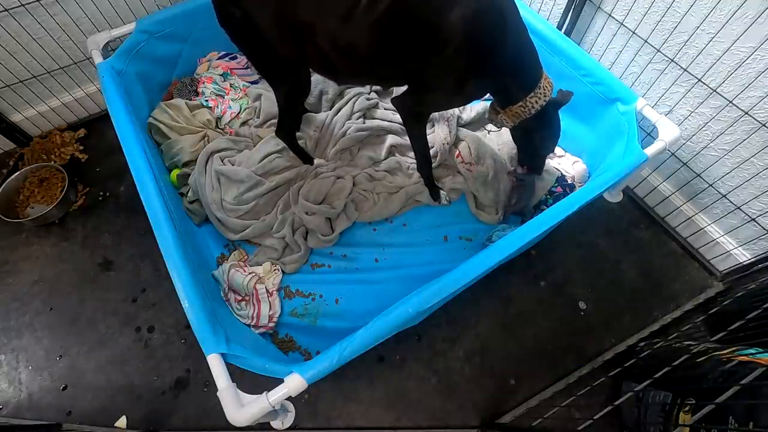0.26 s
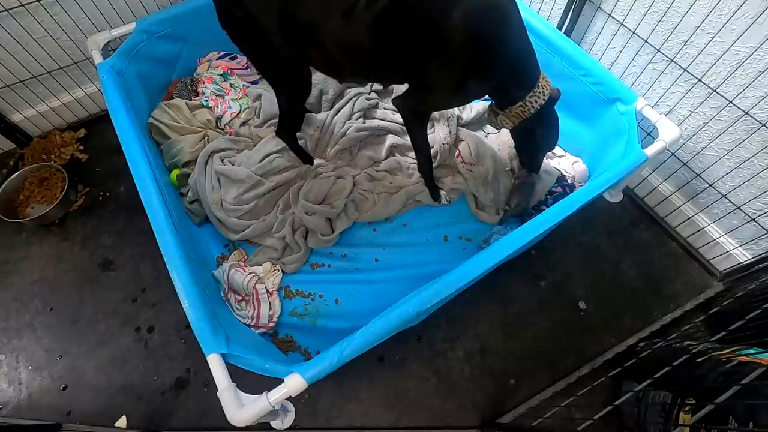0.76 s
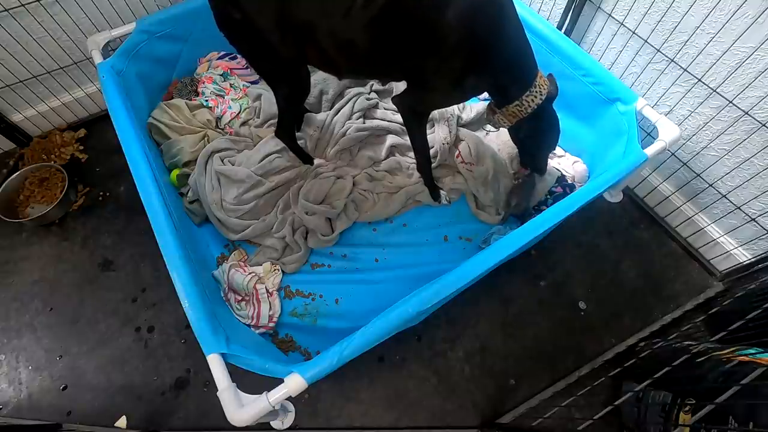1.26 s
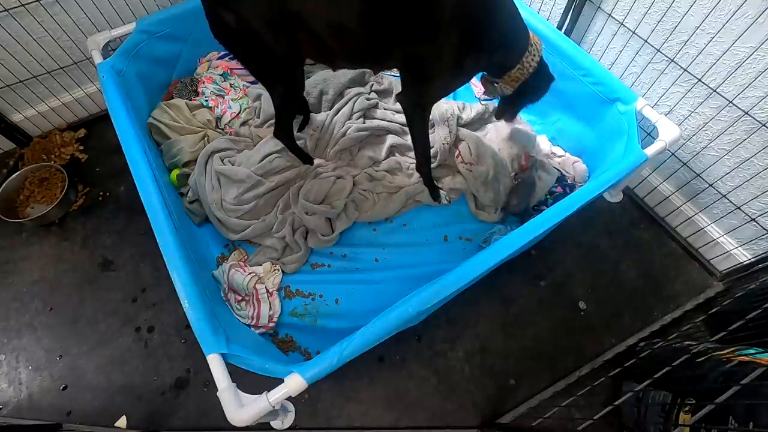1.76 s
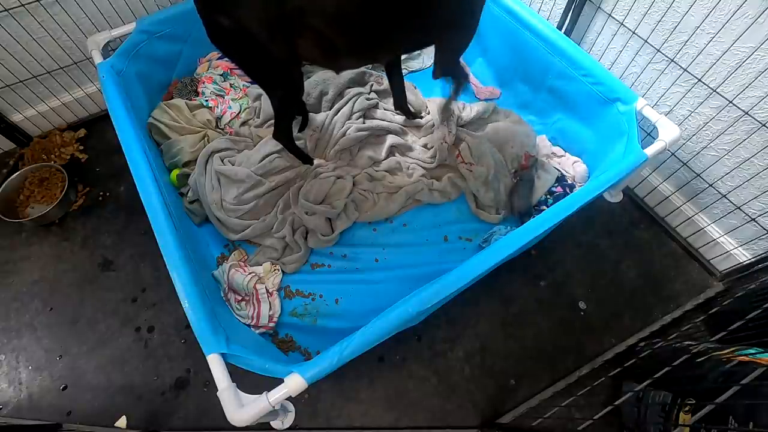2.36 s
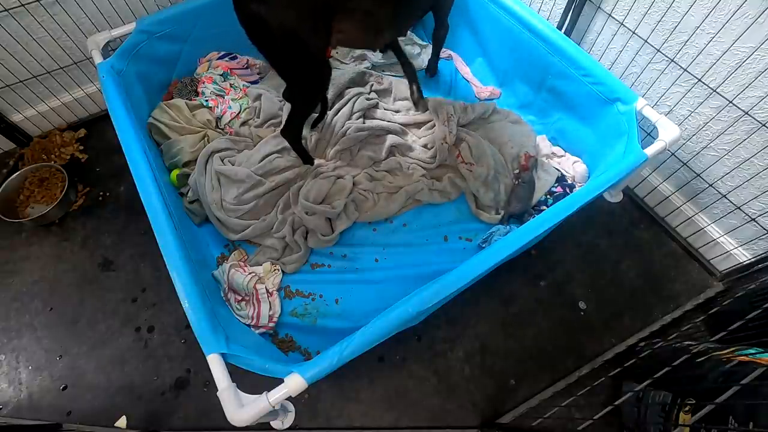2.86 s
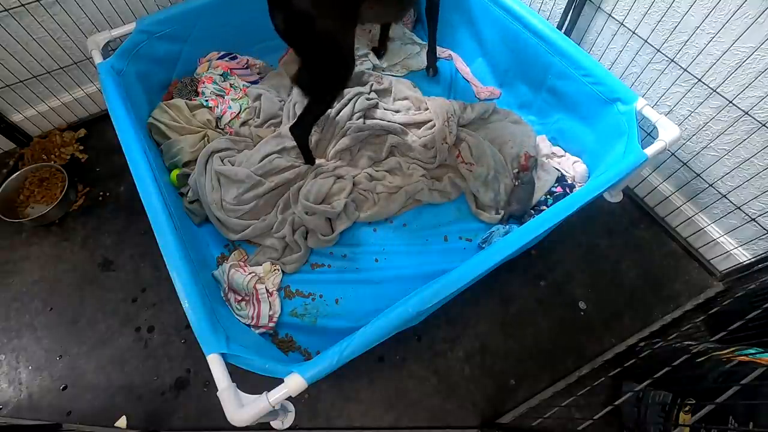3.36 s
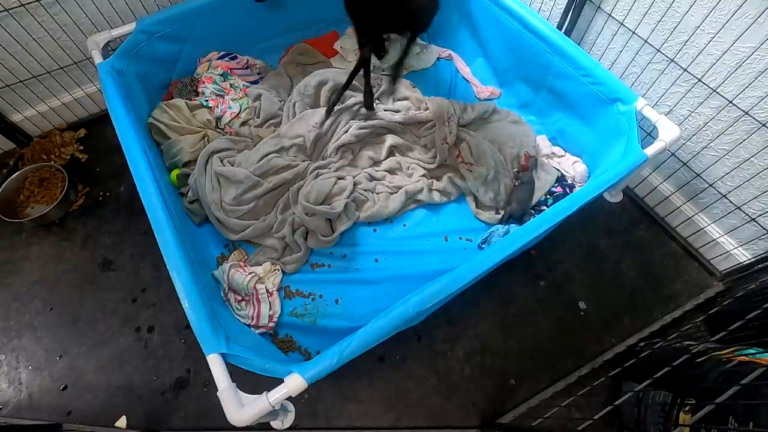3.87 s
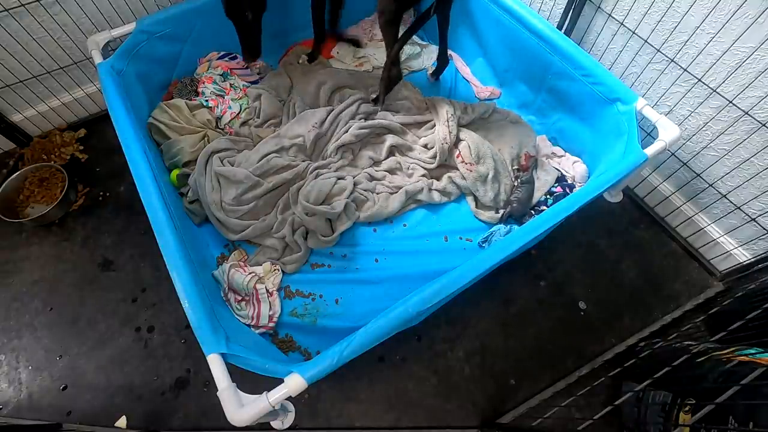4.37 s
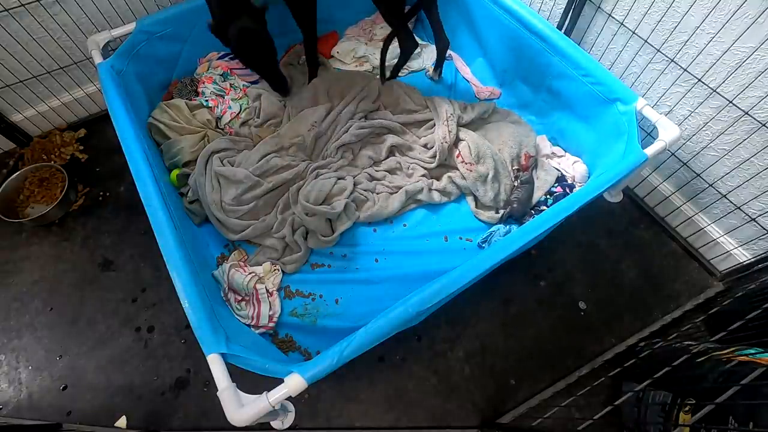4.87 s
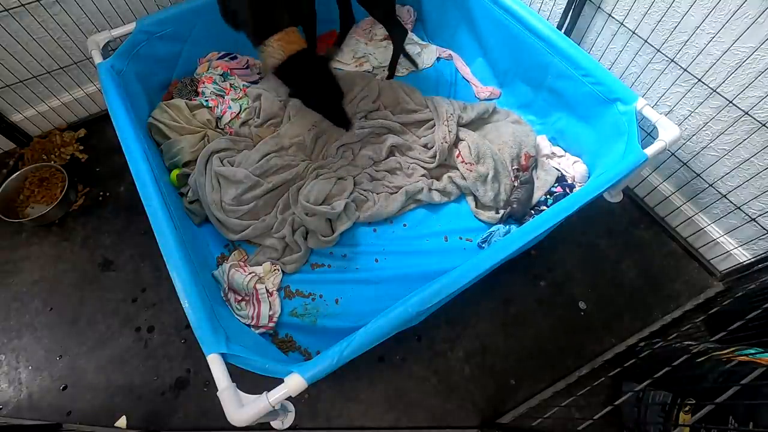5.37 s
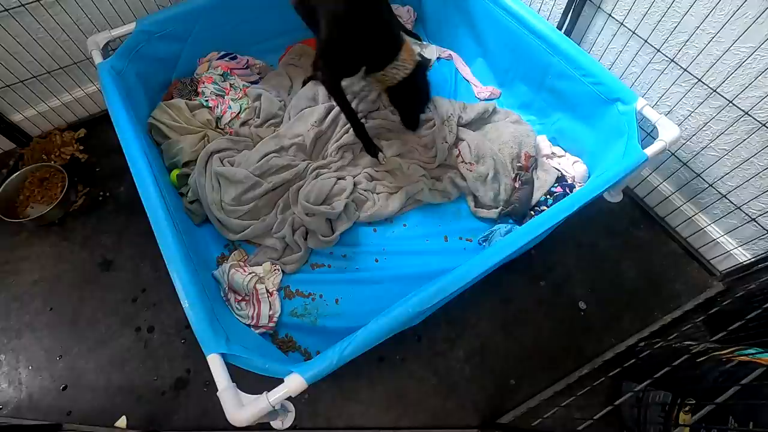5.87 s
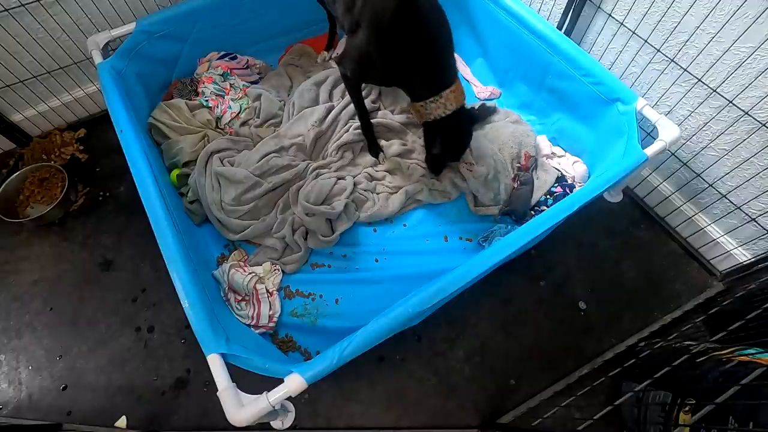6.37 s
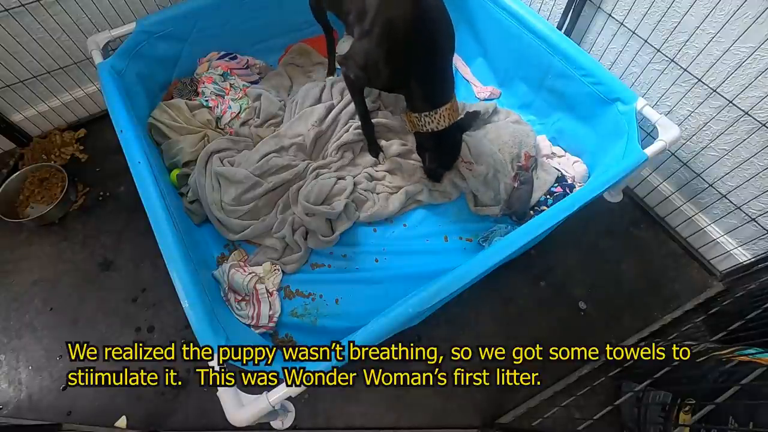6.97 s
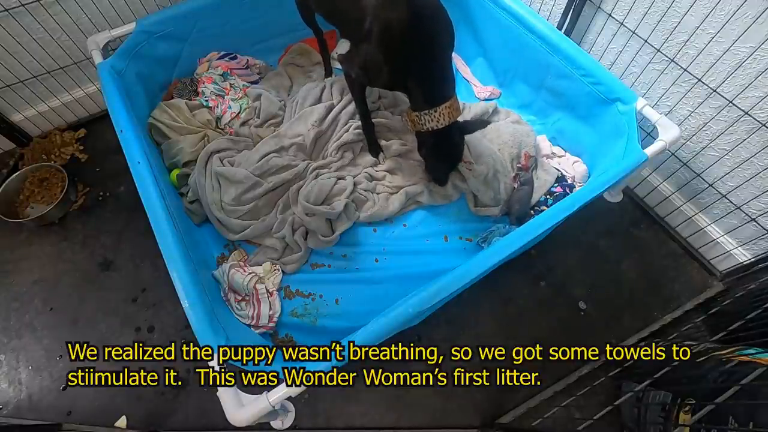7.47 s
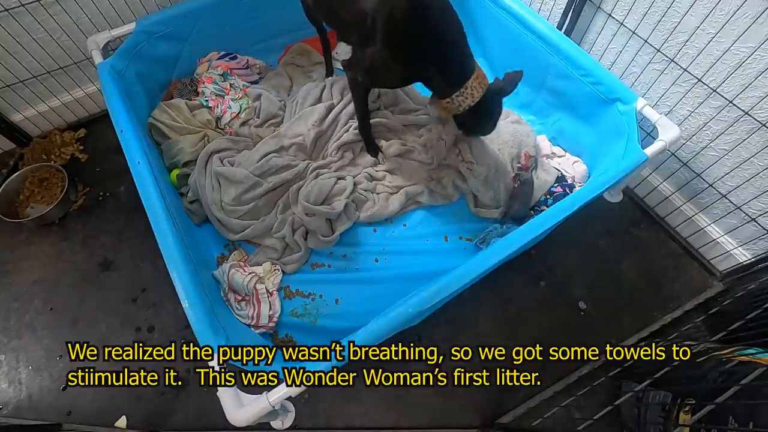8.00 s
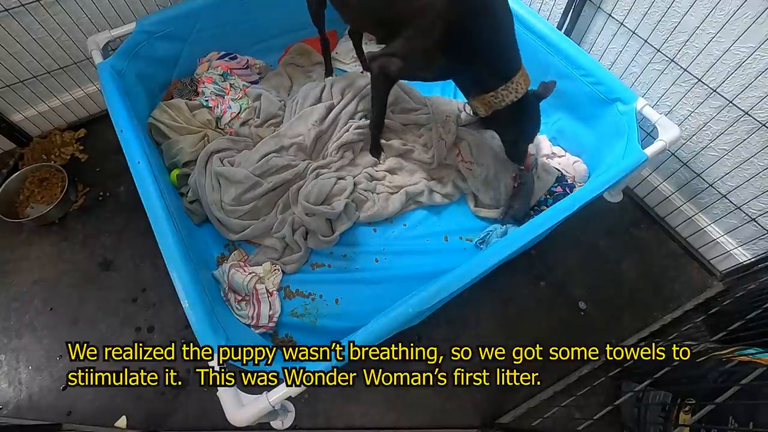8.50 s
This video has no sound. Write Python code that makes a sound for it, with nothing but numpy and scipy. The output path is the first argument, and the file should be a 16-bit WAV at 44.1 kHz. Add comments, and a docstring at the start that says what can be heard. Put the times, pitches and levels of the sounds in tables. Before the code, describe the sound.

In a quiet kennel room with soft hum and low air rumble, a dog moves about on blankets in a plastic-sheet pen. Dull thuds and drummy rustles come first, then paw scuffs and claw ticks, a small collar tag clinking near three seconds, and sharper scratches. Later the nose snuffles while cloth rubbing grows loudest, close to a stereo microphone.

```python
"""A dog moves on blankets in a taut plastic-sheet pen in a quiet kennel room, before a two-port microphone.
From the start, over soft hum noise and low air rumble, trains of tiny slips rub cloth and drum the sheet; filtered
noise lands as dull thuds. From 1 s paws scuff in dying noise bursts with claw ticks. A tag clinks from 2.9 s, mostly
before 3.4 s, as fading sine modes. Air gusts are strongest near 5.2 s. From 6.6 s the nose snuffles, noise in a falling
resonance; the cloth is loudest near 7.8 s, and snuffles return at 8.4 s."""
import sys
import numpy as np
from scipy import signal
from scipy.fft import rfft, irfft
from scipy.io import wavfile
from scipy.ndimage import uniform_filter1d

SR = 44100
rng = np.random.default_rng(int(sys.argv[2]) if len(sys.argv) > 2 else 0)


def store_pcm(level_fs):
    """Save levels as 16-bit WAV."""
    pcm = np.round(np.clip(level_fs, -1, 1) * 32767).astype(np.int16)
    wavfile.write(sys.argv[1], SR, np.atleast_2d(pcm).T)


N = 385434

# Spectrum of fibres and fur: hz, relative_density_db (dB per Hz)
FIZZ = [(1470, -52), (2500, -2), (3690, -1), (5710, -4), (8700, -12), (12100, -23.5), (14400, -35),
        (15600, -46)]
# Where the dog is: time_s, left_minus_right_db
PLACE = [(0.0, 3), (0.85, 5), (1.27, -0.5), (2.02, 3.5), (2.38, 0), (4.65, 3.5), (5.23, -2.5), (5.84, 3),
         (8.01, 5), (8.74, 2)]
# Strokes of dragging cloth: start_s, rise_s, hold_s, rub_level_db, fade_db_per_s,
# sheet_weight_db (re rub), fibre_fizz_db (re rub), drum_note_hz
STROKES = [(0.0, 0.003, 0.28, -71, 37, 5, -1, 330), (0.328, 0.0072, 0.085, -51, 111, 8.5, -8, 513),
           (0.575, 0.0097, 0.032, -45, 106, 9.5, -10, 476), (0.702, 0.055, 0.03, -43, 54, 1, -9.5, 447),
           (0.803, 0.012, 0.048, -44.5, 110, 6.5, -5, 475), (1.09, 0.023, 0.18, -76.5, 56, -5, 8.5, 320),
           (1.508, 0.0064, 0.031, -72.5, 80, 12, -2, 494), (1.646, 0.003, 0.089, -59, 220, -0.5, 1.5, 543),
           (1.803, .01, 0.018, -59, 120, 1, -5, 500), (1.852, 0.044, 0.022, -46.5, 139, 5, -3.5, 580),
           (2.43, 0.009, .03, -69.5, 16, 2, 0, 267), (2.625, 0.0045, 0.031, -59, 79, -5.5, -14, 267),
           (2.733, 0.016, 0.088, -65.5, 55, 2.5, -6.5, 297), (2.89, 0.021, 0.022, -64, 60, -15, 3.5, 290),
           (3.004, 0.061, 0.16, -61, 76, -0.5, -1, 250), (3.402, 0.005, 0.028, -59.5, 150, -3.5, -13, 266),
           (3.553, 0.013, 0.012, -72.5, 71, -4, 9, 275), (3.712, 0.011, 0.037, -62, 130, -13, -2, 275),
           (3.809, 0.0025, 0.0059, -43.5, 99, -10.5, -6, 259),
           (4.035, 0.0022, 0.0061, -52.5, 204, -7, 0, 420), (4.073, 0.016, 0.01, -51.5, 65, -8, -5.5, 417),
           (4.248, 0.0032, 0.028, -56, 63, -4.5, 4, 476), (4.34, 0.029, 0.028, -55.5, 106, -0.5, -5, 482),
           (4.575, 0.02, 0.056, -53.5, 123, -18, -4.5, 640), (4.91, 0.0098, 0.014, -65, 87, -25, -14, 250),
           (5.228, 0.023, 0.24, -59.5, 44, -7, 3, 292), (5.565, 0.16, 0.016, -51, 84, -16, 1.5, 300),
           (5.677, 0.029, 0.14, -46.5, 118, -1.5, -19, 358),
           (6.015, 0.0064, 0.0044, -44, 121, -5.5, 2, 374), (6.24, 0.028, 0.16, -65.5, 58, -6, -5, 310),
           (6.371, 0.057, 0.011, -41.5, 142, -8.5, -13.5, 570),
           (6.502, 0.0058, 0.011, -36, 86, -17, -14, 280), (6.518, 0.0071, 0.0062, -38, 112, 3, -7, 294),
           (6.634, 0.039, 0.034, -46, 85, -9.5, -16, 408),
           (6.756, 0.016, 0.028, -53.5, 89, -2.5, -24.5, 517),
           (6.887, 0.0075, 0.031, -46.5, 82, -9.5, -20.5, 613),
           (7.023, 0.019, 0.086, -43, 98, -8.5, -16, 442), (7.215, 0.026, 0.068, -52, 26, -0.5, -10.5, 533),
           (7.369, 0.082, 0.013, -41.5, 74, -5, -13, 500), (7.581, 0.013, 0.017, -47, 90, -8.5, -11.5, 506),
           (7.626, 0.12, 0.057, -35.5, 88, -7.5, -20, 460), (7.824, 0.0079, 0.02, -32, 90, -6, -34, 454),
           (7.883, 0.022, 0.032, -34.5, 90, -16, -19.5, 354),
           (7.99, 0.012, 0.031, -33.5, 79, -9, -17.5, 460),
           (8.197, 0.068, 0.039, -45.5, 102, -35, -6.5, 585),
           (8.355, 0.048, 0.014, -37.5, 69.5, -26, -12, 580), (8.435, 0.029, 0.2, -63.5, 55, 5, 0.5, 600)]


def gain_of(db):
    """Decibels to amplitude."""
    return 10 ** (np.asarray(db) / 20)


def evened(x):
    """Scales to rms 1."""
    return x / np.sqrt(np.mean(x ** 2) + 1e-20)


def read(points, hz, axis=1):
    """A spectrum column on a log-frequency axis."""
    table = np.transpose(points)
    return np.interp(np.log(hz + 1), np.log(table[0] + 1), table[axis])


def follow(rows, axis):
    """A curve column at every sample."""
    table = np.vstack(rows).T
    return np.interp(np.arange(N) / SR, table[0], table[axis])


def spread(per_ms):
    """From ms steps to samples."""
    return np.interp(np.arange(N) / SR * 1000, np.arange(len(per_ms)), per_ms)


def panned(x, db):
    """Two channels, the left louder than the right by db."""
    return x * gain_of(np.array([db / 2 * np.ones(N), -db / 2 * np.ones(N)]))


def shaped(x, spectrum, patchy_db, size, peak_hz=None, peak_db=0., octaves=1.):
    """Colours x, lifts a moving resonance and lets random patches of time and frequency stand out."""
    overlap = size * 3 // 4
    hz, t, z = signal.stft(x, SR, nperseg=size, noverlap=overlap)
    patches = rng.standard_normal(z.shape[::-1]).T
    patches = uniform_filter1d(patches, size=4, axis=0)
    patches = evened(uniform_filter1d(patches, size=12, axis=1))
    colour = gain_of(read(spectrum, hz))[:, None] * np.ones(t.size)
    if peak_hz is not None:
        centre = np.interp(t, np.arange(N) / SR, peak_hz)
        distance = np.log2((hz[:, None] + 1) / centre) / octaves
        colour = colour * gain_of(peak_db * np.exp(-distance ** 2))
    colour = colour / np.linalg.norm(colour, axis=0)  # the resonance moves the colour, not the loudness
    z = z * colour * gain_of(patchy_db * patches)
    return evened(signal.istft(z, SR, nperseg=size, noverlap=overlap)[1][:N])


def hum():
    """Soft steady room noise, most alike in the two ports around 300 Hz."""
    # The quiet room's spectrum: hz, relative_density_db (dB per Hz)
    hum_colour = [(35, -42), (60, -0.5), (91, 3.5), (132, -0.5), (278, 7.5), (443, -6), (775, -13),
                  (1000, -14), (1520, -6), (3510, -30), (5100, -12.5), (8500, -20.5), (11500, -38),
                  (15600, -59)]
    # Left-right likeness: hz, correlation (0 to 1)
    likeness = [(60, 0.28), (125, 0.39), (300, 0.83), (900, 0.12), (3800, 0.078)]
    a, b = (shaped(rng.standard_normal(N), hum_colour, patchy_db=2.0, size=2048) for _ in "LR")
    same = np.clip(read(likeness, np.fft.rfftfreq(N, 1 / SR)), -1, 1)
    right = irfft(same * rfft(a) + np.sqrt(1 - same ** 2) * rfft(b), N)
    return gain_of(-65) * np.array([a, right])


def air():
    """Moving air at the microphone: lumpy low rumble, mostly shared by the ports, swelling in gusts."""
    # Gusts: centre_s, level_db, half_width_s (to 1/e of the amplitude)
    gusts = [(0.75, -66, 0.22), (1.9, -74, 0.17), (4.0, -81, 0.25), (4.93, -64.5, 0.17),
             (5.2, -53.5, 0.098), (5.75, -65, 0.093), (6.35, -59, 0.19), (6.9, -58, 0.077),
             (8.7, -64, 0.16)]
    calm_db = -73
    band = signal.butter(2, [20., 48.], "band", fs=SR, output="sos")
    shared, left, right = signal.sosfilt(band, rng.standard_normal((3, N)))
    t = np.arange(N) / SR
    swells = sum(gain_of(db) * np.exp(-((t - s) / width) ** 2) for s, db, width in gusts)
    return (gain_of(calm_db) + swells) * evened(shared + 0.56 * np.array([left, right]))


def thuds():
    """The dog's weight lands dully: low resonant noise of the pen swells and dies under each heavy step."""
    # Heavy steps: start_s, level_db (before rise and fade)
    steps = [(.345, -42), (.595, -42.5), (.82, -44), (1.9, -44.5)]
    centre_hz, rise_s, t60_s = 194, 0.047, 0.53
    resonance = signal.iirpeak(centre_hz, 1.6, SR)
    low = signal.lfilter(*resonance, rng.standard_normal(N))
    low = evened(signal.lfilter(*resonance, low))
    start, db = np.transpose(steps)[:, :, None]
    after = np.maximum(np.arange(N) / SR - start, 0)
    level = np.minimum(after / rise_s, 1) * gain_of(db - 60 * after / t60_s)
    return low * level.sum(0)


def tag():
    """The metal tag rings its modes, each blow exciting them a little differently; light touches die sooner."""
    # Collar tag clinks: start_s, level_db, low_modes_db (relative)
    clinks = [(2.881, -64, -13), (3.047, -46.5, -10), (3.072, -78, 1), (3.126, -69, 10),
              (3.147, -65.5, 6.5), (3.183, -75, -3), (3.215, -64, -2), (3.254, -57.5, -4), (3.312, -74, -9),
              (4.916, -72, 7), (5.685, -71, 16), (6.245, -67, -1), (6.374, -70, -9), (6.493, -69, -8),
              (6.649, -67, -6), (6.738, -66, 7)]
    # Tag modes: hz, relative_level_db, t60_s (longest, for firm touches)
    tag_modes = [(3120, 4, 0.14), (7090, 3, 0.1), (7140, -7, 0.3), (8452, 3, 0.18), (8823, -12, 0.13),
                 (14400, -24, 0.3), (14780, -24, .3)]
    split_hz = 8000  # modes under this count as low
    out, t = np.zeros(N + 8192), np.arange(8192) / SR
    chance_db = rng.standard_normal((len(clinks), len(tag_modes)))
    for (s, db, low_db), blow_db in zip(clinks, chance_db):
        lasts = np.clip(gain_of(.25 * (db + 58)), .5, 1)
        rings = np.zeros(8192)
        for (hz, mode_db, t60), extra_db in zip(tag_modes, blow_db):
            level_db = mode_db + low_db * (hz < split_hz) + extra_db
            rings += gain_of(level_db - 60 * t / (t60 * lasts)) * np.sin(2 * np.pi * hz * t)
        out[round(s * SR):][:8192] += gain_of(db) * np.minimum(t / 0.0011, 1) * rings
    return panned(out[:N], 0)


def snuffles():
    """Turbulent air through the nose: noise in one falling resonance, passed twice so it sounds hollow."""
    # Snuffles into the blankets: start_s, length_s, level_db, change_by_end_db,
    # resonance_from_hz, resonance_to_hz, width_hz (of each pass)
    sniffs = [(6.64, 0.13, -42.5, 0.5, 1550, 1450, 450), (6.769, 0.16, -37.5, -20, 1750, 1540, 870),
              (6.928, 0.12, -38, -11, 1900, 1630, 220), (6.927, 0.13, -35, -11, 1460, 970, 262),
              (7.036, 0.087, -42, 2.5, 1670, 1610, 600), (8.38, 0.074, -38.5, -5, 1680, 1670, 110),
              (8.464, 0.19, -42, -8, 925, 646, 470)]
    rise, settle = 0.093, 0.13  # shares of the length: level rise, time constant of the pitch fall
    out = np.zeros(N)
    for s, length, db, change_db, from_hz, to_hz, width_hz in sniffs:
        u = np.arange(0, length, 1 / SR) / length
        hz = to_hz + (from_hz - to_hz) * np.exp(-u / settle)
        turn = np.exp(2j * np.pi * np.cumsum(hz) / SR)
        r = np.exp(-np.pi * width_hz / SR)
        # filter around zero frequency, then turn back up to the moving pitch
        noise = rng.standard_normal(SR // 4)[:u.size]
        slow = signal.lfilter([1], [1, -2 * r, r * r], noise / turn)
        shape = np.minimum(u / rise, 1) * gain_of(change_db * u) * np.sqrt(1 - u)
        out[round(s * SR):][:u.size] += gain_of(db) * shape * evened((slow * turn).real)
    return panned(out, follow(PLACE, axis=1))


def paws():
    """Each scuff is a dying burst of uneven noise: a broad ring and a bright edge, with a short claw tick."""
    # Paw scuffs and claw ticks: contact_s, level_db, centre_hz, treble_db (re ring), t60_s
    scuffs = [(1.07, -38, 900, -19, 0.13), (1.197, -37.5, 1510, -15, 0.05), (1.513, -39, 750, -18, 0.086),
              (1.81, -46.5, 1490, -14, 0.095), (2.63, -35, 2160, -19, 0.044),
              (2.643, -32.5, 1550, -32, 0.025), (2.66, -37.5, 2300, -13, 0.091),
              (2.67, -34.5, 1440, -10.5, 0.1), (3.411, -51, 1200, -2, 0.095), (3.477, -41, 940, -26, 0.03),
              (3.598, -45, 1510, -25, 0.026), (3.696, -44, 1620, 1, 0.024), (3.713, -37, 1620, -6, 0.053),
              (3.814, -31, 1720, -1.5, 0.054), (3.898, -27.5, 2230, -34, 0.073),
              (4.039, -33, 1850, -1, 0.044), (4.088, -37, 1730, -8, 0.1), (4.111, -37.5, 4000, 14, 0.011),
              (4.119, -21, 1730, -1, 0.0086), (4.256, -34, 2270, -6, 0.061),
              (4.298, -47, 2620, 19.5, 0.058), (4.62, -37, 1250, -25, 0.14),
              (4.659, -62.5, 2980, 26, 0.045), (4.949, -46, 2600, -14, 0.056),
              (4.964, -45.5, 2900, -16, 0.04), (5.047, -50, 1960, -14, 0.072),
              (5.058, -47, 2050, -12, 0.048), (5.452, -41, 584, -30, 0.029), (6.02, -35, 3000, 15.5, 0.043),
              (6.53, -18.5, 3250, -23, 0.11), (6.803, -48, 5000, -3, 0.03), (7.455, -26, 1300, -24, 0.056),
              (7.688, -30.5, 3070, -8, 0.11), (7.721, -28, 3300, -18, 0.096), (7.76, -21, 2070, -25, 0.14),
              (7.772, -18.5, 1510, -32, 0.046), (7.837, -18.5, 1790, -47, 0.08),
              (7.914, -25, 1480, -38, 0.12), (8.015, -34, 1740, -32, 0.035), (8.035, -24, 1230, -24, 0.19)]
    rings, edges, t = np.zeros(N + 8192), np.zeros(N + 8192), np.arange(8192) / SR
    hz = np.fft.rfftfreq(8192, 1 / SR)
    for s, db, centre_hz, treble_db, t60 in scuffs:
        grains = gain_of(2.6 * np.minimum(rng.exponential(1, 8192), 4.))
        burst = rfft(rng.standard_normal(8192) * grains)
        detune = (hz / centre_hz - centre_hz / (hz + 1)) / 0.37
        ring = irfft(burst / (1 + detune ** 2))
        edge = irfft(burst * gain_of(read(FIZZ, hz)))
        shape = (1 - np.exp(-t / 0.0014)) * gain_of(-60 * t / max(t60, .01))
        size = gain_of(db - 9.5) * np.sqrt(np.mean(shape ** 2))  # longer shapes carry more energy
        tick = gain_of(db - 5 - 60 * t / min(t60, 0.022)) * np.sin(2 * np.pi * centre_hz * t)
        start = round((s - .0006) * SR)  # the sound begins just before the listed time
        rings[start:][:8192] += size * evened(shape * ring)
        rings[start:][:8192] += tick
        edges[start:][:8192] += size * gain_of(treble_db) * evened(shape * edge)
    return panned(rings[:N], follow(PLACE, axis=1)) + edges[:N]


def slips(per_s, spread_db, clump_db):
    """Tiny stick-slip clicks of random sign and size, their strength varying in clumps of about 11 ms."""
    size = gain_of(spread_db * np.minimum(rng.exponential(1, N), 3.5))
    clumps = evened(uniform_filter1d(rng.standard_normal(N), size=500))
    return size * gain_of(clump_db * clumps) * rng.standard_normal(N) * (rng.random(N) < per_s / SR)


def stroke_powers(lag_s, damping):
    """Power of every stroke at each ms: a softly starting rise, a hold, then a steady dB fade."""
    start, rise, hold, db, fade = np.transpose(STROKES)[:5, :, None]
    t = np.arange(0, N / SR + .01, .001) - lag_s - start
    rise = np.maximum(rise, .001)
    swell = np.clip(t / rise, 0, 1) ** 1.25  # an exponent over 1 starts the rise softly
    fading_s = np.maximum(t - rise - np.maximum(hold, 0), 0)
    return (swell * gain_of(db - damping * fade * fading_s)) ** 2


def cloth():
    """One train of slips drums the sheet and rubs the blankets; the fizz comes from all over the cloth."""
    # Drumming plastic sheet: hz, relative_density_db (dB per Hz)
    sheet_colour = [(47, -48), (120, -7), (221, -0.5), (491, -5), (760, -4), (1160, -17), (1500, -23),
                    (1950, -82)]
    # Resonances added to the sheet: hz, width_hz, added_level_db
    sheet_modes = [(216, 230, 1), (387, 19, -2), (551, 78, -3.5), (780, 34, -3), (922, 67, 9.5)]
    # Cloth on cloth: hz, relative_density_db (dB per Hz)
    rub_colour = [(290, -69), (520, -10.5), (824, -7.5), (1080, 2.5), (1950, 1), (2720, -4), (3450, -5.5),
                  (4050, -11.5), (6000, -26.5), (7800, -52), (13200, -120)]
    stir_db, stir_sheet_db, stir_fizz_db, rest_note_hz = -78.5, -86, -79, 250  # never quite still
    frame_hz, frame_width_hz, frame_db = 2230, 140, -15  # the pen's frame rings faintly

    weight_db, fizz_db, note_hz = np.transpose(STROKES)[5:, :, None]
    slide = stroke_powers(lag_s=0, damping=1)
    # weight sinks into the sheet after the cloth starts to slide, and fades faster
    press = stroke_powers(lag_s=0.0078, damping=1.17) * gain_of(weight_db) ** 2
    rest = gain_of(stir_sheet_db) ** 2
    # the heaviest strokes weigh most in the note
    note = ((press * note_hz).sum(0) + rest * rest_note_hz) / (press.sum(0) + rest)

    train = slips(per_s=8000., spread_db=-1.0, clump_db=0.5)
    sheet = shaped(train, sheet_colour, patchy_db=3.0, size=1024, peak_hz=spread(note), peak_db=19.5,
                   octaves=1.22)
    modes = sum(gain_of(db) * signal.lfilter(*signal.iirpeak(hz, hz / width, SR), sheet)
                for hz, width, db in sheet_modes)
    sheet = evened(sheet + modes)
    frame = signal.lfilter(*signal.iirpeak(frame_hz, frame_hz / frame_width_hz, SR), train)
    sheet = sheet + gain_of(frame_db) * evened(frame)

    rub = shaped(train, rub_colour, patchy_db=3.0, size=512)
    # opposite noise left and right: a stroke covers some width
    side_noise = shaped(rng.standard_normal(N), rub_colour, patchy_db=2.6, size=512)
    rub = evened(rub + 0.37 * np.array([[1], [-1]]) * side_noise)

    wide = (train + 1.94 * slips(per_s=6000., spread_db=0.5, clump_db=2.5) for _ in "LR")
    fizz = np.array([shaped(side, FIZZ, patchy_db=2.5, size=256) for side in wide])

    rub_power = slide.sum(0) + gain_of(stir_db) ** 2
    sheet_power = press.sum(0) + rest
    fizz_power = (slide * gain_of(fizz_db) ** 2).sum(0) + gain_of(stir_fizz_db) ** 2
    near = panned(spread(np.sqrt(rub_power)) * rub, follow(PLACE, axis=1))
    return near + spread(np.sqrt(sheet_power)) * sheet + spread(np.sqrt(fizz_power)) * fizz


def room(x):
    """Reflections: sparse taps of random sign, one in every 20 samples, each band dying at its own speed."""
    # The room's reverberation: hz, t60_s, reverberant_db (0 returns the energy received)
    reverberation = [(250, 0.075, -10), (960, 0.16, -4.5), (2910, 0.47, -7.5), (7600, 0.15, 0)]
    taps = np.zeros((2, SR // 2))
    at = np.arange(120, SR // 2 - 20, 20) + rng.integers(0, 20, (2, (SR // 2 - 121) // 20))
    np.put_along_axis(taps, at, rng.choice([-1., 1.], at.shape), 1)
    hz, t, z = signal.stft(taps, SR, nperseg=256)
    decay = gain_of(-60 * t / read(reverberation, hz)[:, None])
    decay = decay / np.linalg.norm(decay, axis=1, keepdims=True)
    decay = decay * gain_of(read(reverberation, hz, axis=2))[:, None]
    scale = np.sqrt(t.size / (taps ** 2).sum() * 2)  # energy scale for the 0 dB level
    tail = signal.istft(z * decay * scale, SR, nperseg=256)[1]
    return signal.fftconvolve(x.mean(0)[None], tail, axes=1)[:, :N]


def ports(x):
    """The direct sound reaches the two microphone ports with a phase offset."""
    # Phase between the ports: hz, left_lead_rad
    port_turn = [(300, 0), (700, .15), (1550, -.3), (3100, -.8), (5700, .9), (8000, 1.5)]
    turn = np.exp(.5j * read(port_turn, np.fft.rfftfreq(N, 1 / SR)))
    return irfft(rfft(x) * np.array([turn, 1 / turn]), N)


def scene():
    """The dog's sounds, direct and through the room, over the background."""
    dog = cloth() + paws() + snuffles() + thuds()
    clinks = tag()
    direct = ports(dog + clinks)
    reflected = room(dog + gain_of(-5) * clinks)
    return direct + reflected + hum() + air()


def record(dry):
    """The band limit of the recorder: a steep low-pass at 15.7 kHz."""
    low_pass = signal.firwin(511, 15700, window=("kaiser", 9), fs=SR)
    return signal.oaconvolve(dry, low_pass[None], "same")


dry = scene()
out = record(dry)
store_pcm(out)
```